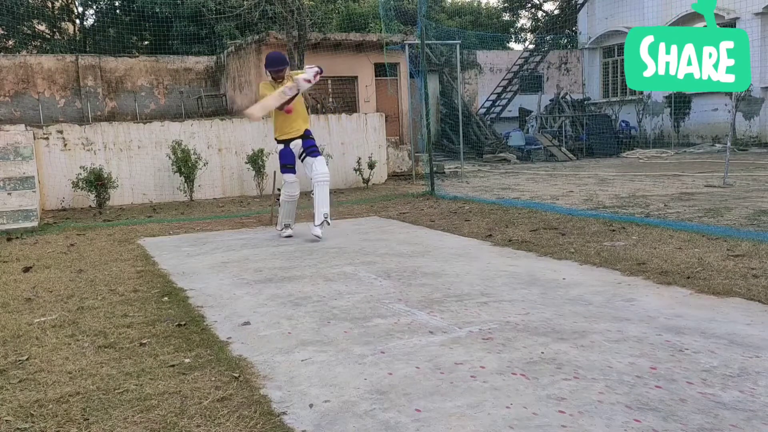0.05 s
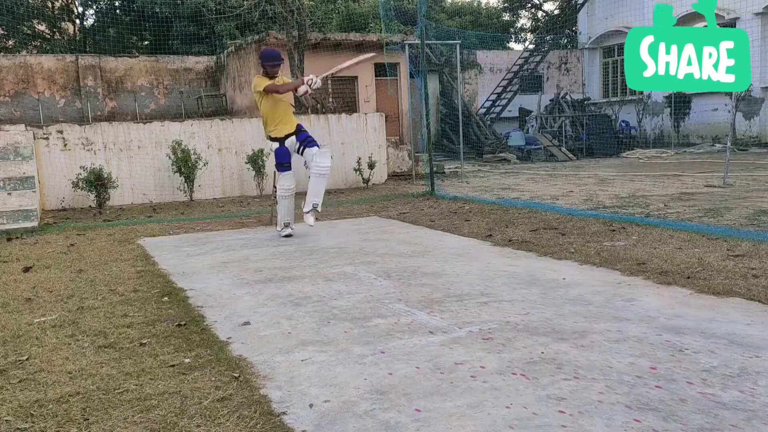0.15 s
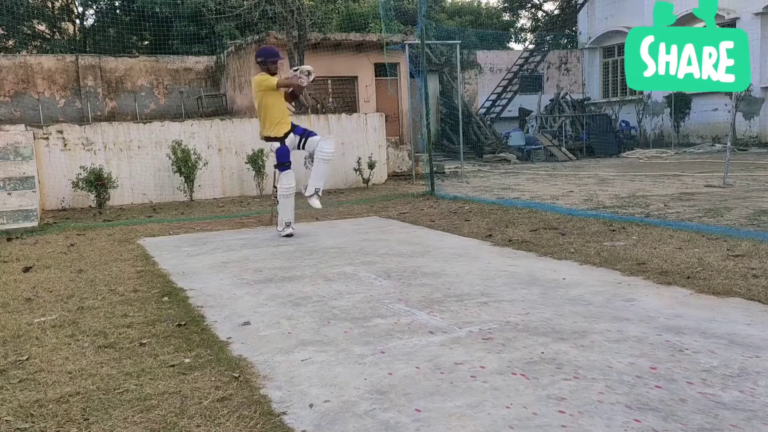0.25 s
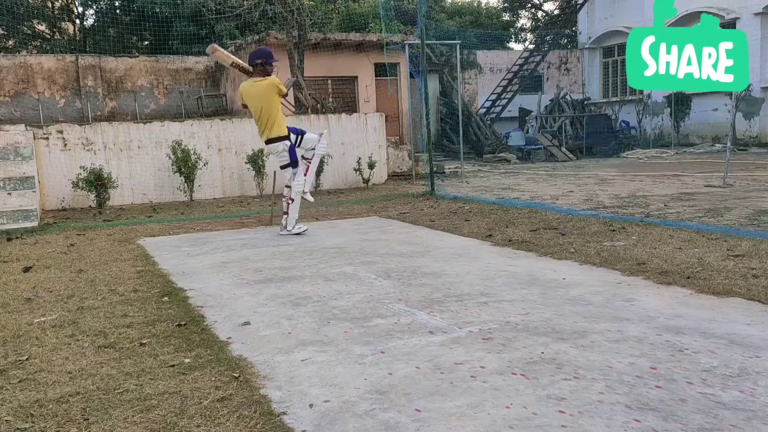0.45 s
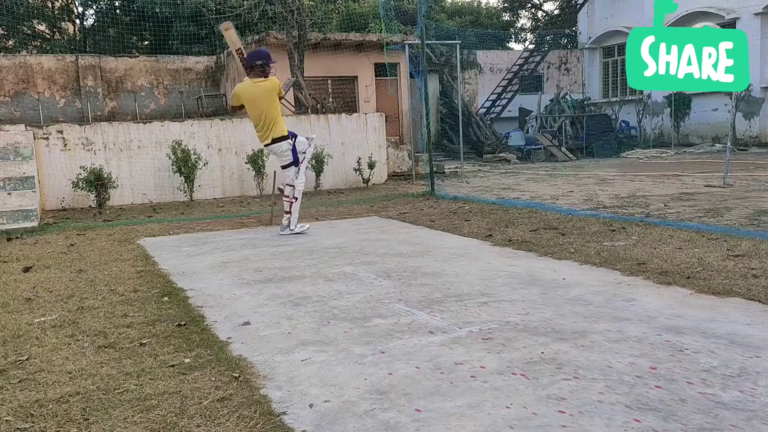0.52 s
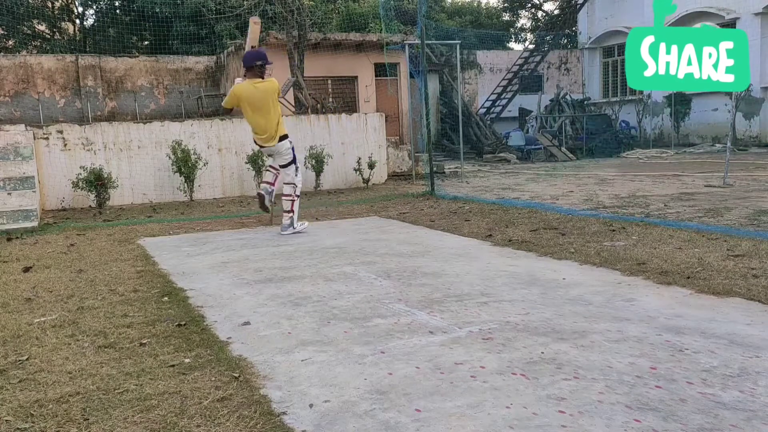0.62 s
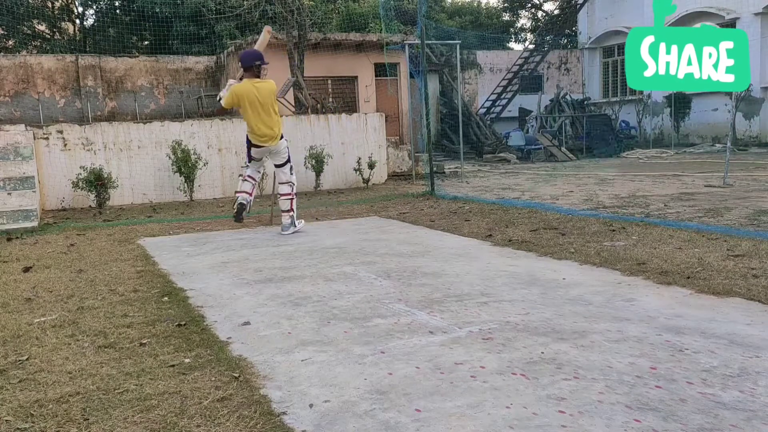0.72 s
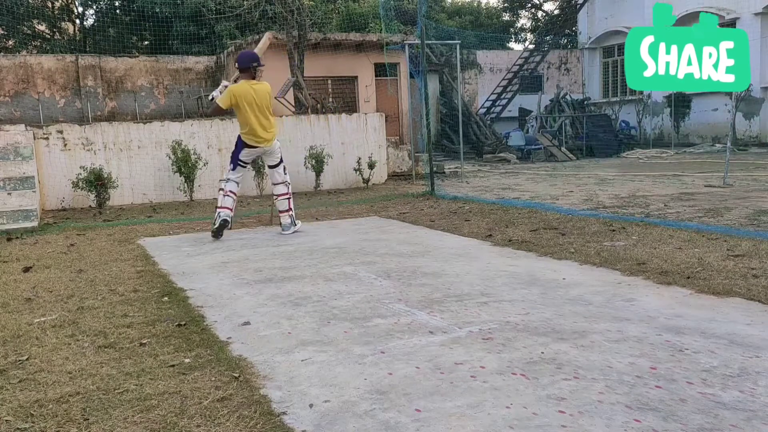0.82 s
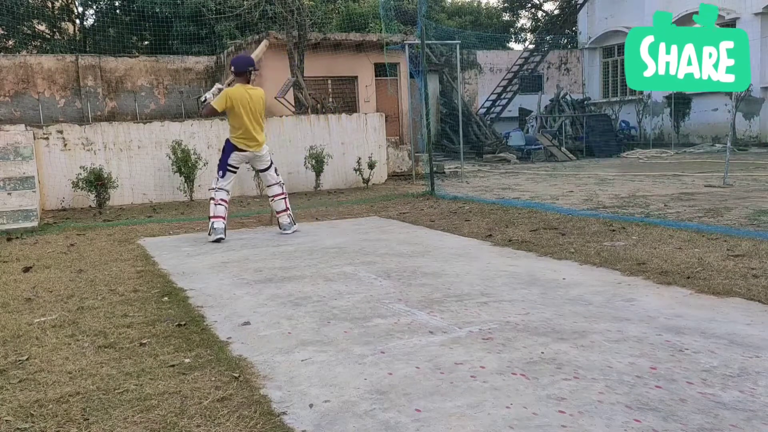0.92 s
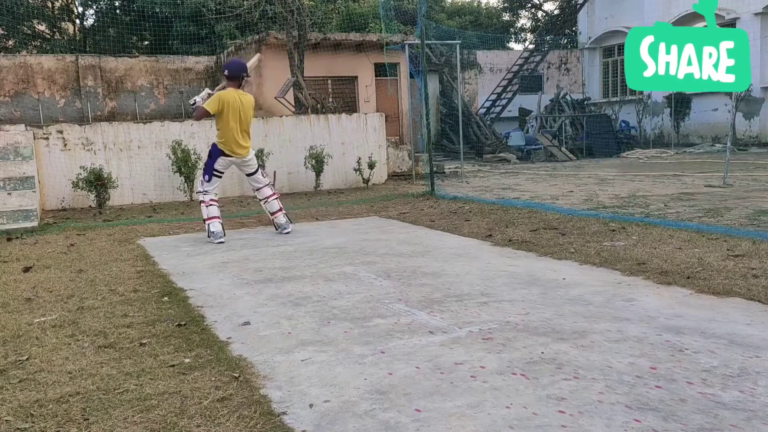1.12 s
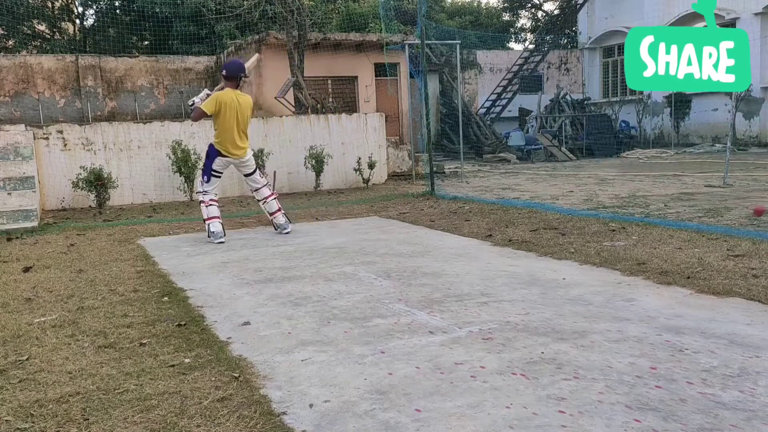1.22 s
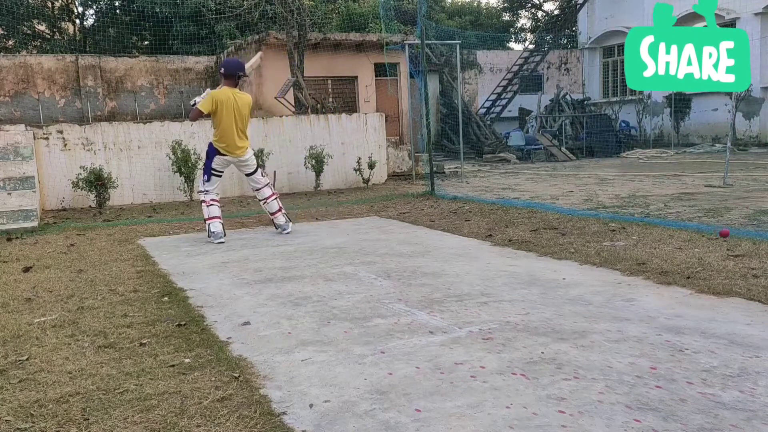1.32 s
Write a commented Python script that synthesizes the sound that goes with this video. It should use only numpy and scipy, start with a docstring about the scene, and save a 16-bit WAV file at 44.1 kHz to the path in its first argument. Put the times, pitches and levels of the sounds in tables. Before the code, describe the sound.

A cricket bat hits a ball with a sharp crack that echoes off nearby walls. Half a second later the ball clangs on a steel net pole. Clothes rustle faintly and a small engine putters far away outdoors.

```python
"""Cricket practice in the nets

A cricket bat cracks against a ball on an outdoor pitch; walls and houses throw the crack back.
Half a second later the ball clangs on a steel pole of the net, which rings as its fittings rattle.
The batter's clothes and shoes rustle, and a small engine putters far away over a soft outdoor rumble."""
import sys
import numpy as np
from scipy import signal
from scipy.fft import rfft, irfft
from scipy.io import wavfile

SR = 44100
rng = np.random.default_rng(int(sys.argv[2]) if len(sys.argv) > 2 else 0)


def generate_wav(signal):
    """Clip the signal to [-1, 1] and save it as 16-bit WAV at the path in sys.argv[1]."""
    frames = np.transpose(np.atleast_2d(signal))
    scaled = np.clip(frames, -1, 1) * 32767
    pcm = np.round(scaled).astype(np.int16)
    wavfile.write(sys.argv[1], SR, pcm)


N = 59535
T = np.arange(N) / SR

# Levels in the tables are relative. A fade is the time to drop by 60 dB.
# A lead is how much sooner a sound reaches the right ear than the left.
# ringing tones of the willow blade and ball: f/Hz, level/dB, fade/s
BAT_TONES = [(1026.4, -6.5, 0.012), (1314, -9.5, 0.0061), (1882, -8.5, .007), (2070, -12, 0.013),
             (2885, -14, 0.016), (5050, -5, 0.0017), (5890, -5.5, .005)]
# tone colour of the bat's crack: f/Hz, level/dB
CRACK_COLOUR = [(200, -38), (700, -3), (1200, -11), (3600, -4), (5000, 7.5), (6300, 7), (8000, 3.5),
                (12000, -5), (15500, -8)]
# the crack scattered by things nearby: f/Hz, level/dB
SCATTER_COLOUR = [(180, 0.5), (400, -10.5), (850, -8), (1300, 3.5), (2100, -1), (2800, -10), (5000, -6),
                  (9000, -7.5), (15000, -16)]
# separate echoes off the walls: t/s, level/dB, lead/ms
WALL_SLAPS = [(.2282, -0.5, 0.208), (0.2811, -8, -0.41), (0.2909, -16, -0.49)]
# tone colour of a wall echo: f/Hz, level/dB
WALL_COLOUR = [(200, -4.5), (650, -9), (880, -19), (1300, -1), (2000, 7), (3000, -13), (5000, -19.5),
               (9000, -15.5), (15000, -33)]
# blurred echoes off houses, near to far: t/s, level/dB, rise/s, fade/s
HOUSE_SWELLS = [(0.2755, -17.5, 0.0051, 0.25), (0.288, -24, 0.0041, 0.27), (0.39, -32.5, 0.0077, 0.32)]
# tone colour of the house echoes: f/Hz, level/dB
HOUSE_COLOUR = [(200, -6), (850, -8), (1300, 5.5), (2100, 2), (2800, -10), (6300, -2.5), (9000, -6),
                (15000, -13.5)]
# tone colour of the yard's long echo: f/Hz, level/dB
YARD_COLOUR = [(200, -10.5), (800, -8), (1300, 7.5), (2100, -2), (2800, -8.5), (5000, -11.5), (9000, -13.5),
               (15000, -22.5)]
# the ball meets the pole, then the fittings rattle: t/s, level/dB, lead/ms
STEEL_HITS = [(.6956, -6, -0.36), (.698, -8.5, -0.4), (0.7198, -27, -0.41), (0.7421, -24.5, -0.28)]
# tone colour of a hit on steel: f/Hz, level/dB
CLANG_COLOUR = [(400, -23.5), (900, -5), (1450, 4), (2350, -13), (3000, -8.5), (5200, -5), (6400, 6.5),
                (7500, -15), (8800, 7), (10500, -3.5), (13000, -4.5), (15500, -17)]
# ringing tones of the pole and net frame: f/Hz, level/dB, rise/s, fade/s
POLE_TONES = [(1050, -35, .012, .14), (1276, -34, .015, .18), (1970, -31, .002, .16),
              (2340, -21, .001, .055), (3520, -40, .085, .6), (3542, -31, .002, .24), (3575, -37, .09, .85),
              (3692, -34, .002, .25), (4090, -31, .001, .14), (6320, -35, .001, .4), (8800, -23, .001, .05),
              (9975, -32, .03, .45), (10062, -28, .001, .38), (10215, -26, .001, .2),
              (10560, -19, .001, .05)]
# tone colour of the rattling frame: f/Hz, level/dB
RATTLE_COLOUR = [(330, -5), (450, 3), (650, 6.5), (1400, 13.5), (2400, 3), (3000, -42), (4000, 10),
                 (9000, -11), (15000, -4)]
# tone colour of the clang's echo: f/Hz, level/dB
POLE_ECHO_COLOUR = [(250, -0.5), (450, 1.5), (900, -1.5), (1500, 5.5), (2300, 5), (3000, -1), (3700, 6),
                    (5000, 1), (6500, 2.5), (10200, 3.5), (11500, -2), (15000, -4.5)]
# brushes of clothes and shoes: t/s, level/dB, rise/s, fade/s
RUSTLE_SWELLS = [(0, -32, 0.00087, 0.55), (0.429, -36, 0.0022, 0.03), (0.953, -43.5, 0.031, 0.62),
                 (1.03, -53, 0.024, 0.42), (1.083, -42.5, 0.0026, 0.03), (1.159, -45, 0.023, 0.23),
                 (1.191, -49, 0.0089, 0.78)]
# tone colour of the rustling: f/Hz, level/dB
RUSTLE_COLOUR = [(300, 10), (1000, -11), (2300, 1.5), (3600, -5), (6500, 6.5), (9000, 5.5), (12000, 1.5),
                 (15000, -11.5)]
# how often the engine fires: t/s, f/Hz
FIRING_RATE = [(.3, 30), (.45, 30.5), (.9, 32), (1.18, 32), (1.35, 33)]
# tones of the exhaust: multiple of the firing rate, level/dB
ENGINE_TONES = [(1, -27), (2, -14.5), (3, -10), (4, -20), (5, -4), (6, -9), (7, -25.5), (8, -24.5),
                (9, -30), (11, -22.5)]
# loudness of the exhaust tones from the fifth multiple up: t/s, level/dB
ENGINE_UPPER_LEVEL = [(0, -44), (.3, -47), (.42, -36.5), (.62, -34.5), (.72, -39), (.8, -46.5),
                      (.95, -41.5), (1.15, -40.5), (1.35, -44.5)]
# loudness of the lower exhaust tones: t/s, level/dB
ENGINE_BASS_LEVEL = [(0, -47), (.65, -40.5), (.85, -39), (1.1, -34.5), (1.35, -42)]
# tone colour of the outdoor background: f/Hz, level/dB
AIR_COLOUR = [(25, 4.5), (60, 6), (110, 0), (200, -2), (350, -12), (800, -17.5), (2000, -19.5),
              (4000, -27.5), (9000, -27), (15000, -28)]
# how alike the ears hear sound from all around: f/Hz, likeness (1 same, -1 opposite)
EAR_LIKENESS = [(60, 0.95), (200, 0.85), (500, 0.73), (1200, -0.43), (2500, 0.15), (6000, -0.0056)]

BAT_HIT_S, BAT_LEAD_MS = .2005, 0.072


def bat():
    """The ball strikes with a bright crack, and the wooden blade gives a short knock."""
    burst = noise(CRACK_COLOUR, direct=.9, lead_ms=BAT_LEAD_MS)
    crack = from_db(-1) * envelope(BAT_HIT_S, .0001, 0.015, hold=0.0012) * burst
    return crack + np.array([blade_knock(BAT_HIT_S + BAT_LEAD_MS / 1000), blade_knock(BAT_HIT_S)])


def blade_knock(start):
    """Each tone builds up over 1.4 cycles, holds while the blade flexes, then dies away."""
    return sum(from_db(db) * envelope(start, 1.4 / hz, fade, hold=0.00325)
               * np.sin(2 * np.pi * hz * (T - start)) for hz, db, fade in BAT_TONES)


def bat_echoes():
    """The crack bounces off nearby things, walls and houses, then lingers in the yard."""
    near = from_db(-19.5) * envelope(BAT_HIT_S, 0.0021, 0.23, hold=0.0026) * noise(SCATTER_COLOUR)
    walls = 0
    for start, db, lead in WALL_SLAPS:
        smear = envelope(start, 0.00032, 0.053) * noise(WALL_COLOUR, direct=0.73, lead_ms=lead)
        walls += from_db(db) * (click(WALL_COLOUR, start, lead) + from_db(-16) * smear)
    house_noise = noise(HOUSE_COLOUR, direct=0.24, lead_ms=-0.355)
    houses = from_db(-4) * swells(HOUSE_SWELLS) * house_noise * pan(1.5)
    yard_noise = noise(YARD_COLOUR, direct=0.69, lead_ms=0.427)
    yard = from_db(-32) * envelope(0.23, 0.055, 1.98, hold=0.096) * yard_noise
    return walls + (near + houses + yard) * from_db(1.5 * drift(161))


def pole():
    """The ball clangs on steel: the pole rings, the net frame rattles and the yard echoes."""
    hits = 0
    for start, db, lead in STEEL_HITS:
        burst = noise(CLANG_COLOUR, direct=0.57, lead_ms=lead)
        burst *= envelope(start, 0.00033, 0.014, hold=0.0007)
        hits += from_db(db) * (from_db(10) * click(CLANG_COLOUR, start, lead) + burst)
    start, _, lead = STEEL_HITS[0]
    rattle = from_db(-31) * envelope(start, 0.015, 0.045, hold=0.031) * noise(RATTLE_COLOUR)
    rattle *= from_db(1.5 * drift(250))
    near = from_db(-24) * envelope(start, 0.0048, 0.41)
    near = near * noise(POLE_ECHO_COLOUR, direct=0.25, lead_ms=lead)
    far = from_db(-34) * envelope(start, 0.022, 0.97, hold=0.074) * noise(POLE_ECHO_COLOUR)
    return (hits + from_db(3) * pole_ring(start) + rattle + near) * pan(2) + far


def pole_ring(start):
    """Each tone of the steel reaches each ear by many paths, so it wavers as it dies."""
    ring = np.zeros((2, N))
    for hz, db, rise, fade in POLE_TONES:
        # complex numbers let both the strength and the timing of the wave wander
        paths = np.array([.5 + .6 * (drift(90) + 1j * drift(90)) for _ in range(2)])
        tone = np.exp(2j * np.pi * (hz * T + rng.random((2, 1))))
        ring += from_db(db) * envelope(start, rise, fade) * np.real(paths * tone)
    return ring


def batter():
    """Cloth and soles brush in short, grainy swells."""
    grain = from_db(2.1 * drift(410))
    return swells(RUSTLE_SWELLS) * grain * noise(RUSTLE_COLOUR, direct=0.2, lead_ms=0.066) * pan(0.91)


def engine():
    """Soft exhaust puffs slowly speed up; tones near five times their rate ring in the silencer."""
    firings = np.cumsum(np.interp(T, *np.transpose(FIRING_RATE))) / SR
    upper_db = np.interp(T, *np.transpose(ENGINE_UPPER_LEVEL))
    bass_db = np.interp(T, *np.transpose(ENGINE_BASS_LEVEL))
    exhaust = 0
    for multiple, db in ENGINE_TONES:
        level_db = db + (bass_db if multiple < 5 else upper_db) + 2.5 * drift(7.92)
        stagger = np.pi * multiple ** 2 / 20  # the tones peak apart, which softens each puff
        exhaust += from_db(level_db) * np.cos(2 * np.pi * multiple * firings + stagger)
    return np.sqrt(2) * exhaust


def outdoor_air():
    """A faint, steady rumble comes from all around."""
    return from_db(-43) * noise(AIR_COLOUR)


def from_db(db):
    """Turn decibels into a number to multiply a sound by."""
    return 10 ** (np.asarray(db) / 20)


def at_hz(table, hz):
    """Read between a table's rows, giving every octave the same width."""
    row_hz, value = np.transpose(table)
    return np.interp(np.log(hz + 1e-9), np.log(row_hz), value)


def colour_gain(colour, hz):
    """Strength of each frequency; below the table's first row it falls 16 dB an octave."""
    octaves_below = np.maximum(-np.log2(hz / colour[0][0]), 0)
    return from_db(at_hz(colour, hz) - 16 * octaves_below)


def envelope(start, rise, fade, hold=0):
    """Loudness over time: a straight rise, a hold, then a fade (all in seconds)."""
    age = T - start
    return np.clip(age / rise, 0, 1) * np.exp(-np.log(1000) * np.maximum(age - rise - hold, 0) / fade)


def swells(table):
    """Add several rises and fades into one loudness curve."""
    return sum(from_db(db) * envelope(start, rise, fade) for start, db, rise, fade in table)


def drift(per_s):
    """A random wobble, roughly 1 either way, with per_s new values a second."""
    return np.interp(T * per_s, np.arange(N), rng.standard_normal(N))


def pan(left_db):
    """Make the left ear louder than the right by left_db."""
    return from_db(np.array([[left_db], [-left_db]]) / 2)


def noise(colour, direct=0, lead_ms=0):
    """Stereo noise of strength 1: the direct share comes from one side, the rest from all around."""
    hz = np.arange(1, N // 2 + 2) * SR / N
    mid, side, beam = rfft(rng.standard_normal((3, N)))
    alike = at_hz(EAR_LIKENESS, hz)
    ears = np.array([[1], [-1]])
    around = np.sqrt((1 + alike) / 2) * mid + ears * np.sqrt((1 - alike) / 2) * side
    beam = beam * np.exp(-1j * np.pi * hz * ears * lead_ms / 1000)
    sound = irfft((np.sqrt(1 - direct) * around + np.sqrt(direct) * beam) * colour_gain(colour, hz), N)
    return sound / np.sqrt(np.mean(sound ** 2))


def click(colour, start, lead_ms):
    """A sharp click of height 1 that reaches the two ears a little apart."""
    hz = np.arange(1, N // 2 + 2) * SR / N
    # folding the cepstrum (the log spectrum, taken back to time) stops sound coming before the hit
    cepstrum = irfft(np.log(colour_gain(colour, hz)), N)
    cepstrum[1:N // 2 + 1] *= 2
    cepstrum[N // 2 + 1:] = 0
    spectrum = np.exp(rfft(cepstrum))
    arrival = start + np.array([[lead_ms / 1000], [0]])
    delay = np.exp(-2j * np.pi * np.arange(len(hz)) * SR / N * arrival)
    return irfft(spectrum * delay, N) / np.abs(irfft(spectrum, N)).max()


def close_reflection(sound, delay_s=.00073, from_hz=3000):
    """A bounce right beside the microphone cuts evenly spaced dips into the treble."""
    hz = np.arange(N // 2 + 1) * SR / N
    share = .35 * hz ** 4 / (hz ** 4 + from_hz ** 4)
    bounce = share * np.exp(-2j * np.pi * hz * delay_s)
    return irfft(rfft(sound) * (1 - bounce) / np.sqrt(1 + share ** 2), N)


def scene():
    """Mix the bat and the engine with the sounds that also bounce beside the microphone."""
    return bat() + close_reflection(bat_echoes() + pole() + batter() + outdoor_air()) + engine()


def record(dry, ceiling=1.05, cutoff_hz=15600):
    """The loudest peaks overload the microphone, and the highest treble is cut away."""
    squashed = ceiling * np.tanh(dry / ceiling)
    return signal.sosfilt(signal.ellip(12, .2, 80, cutoff_hz, fs=SR, output="sos"), squashed)


dry = scene()
out = record(dry)
generate_wav(out)
```